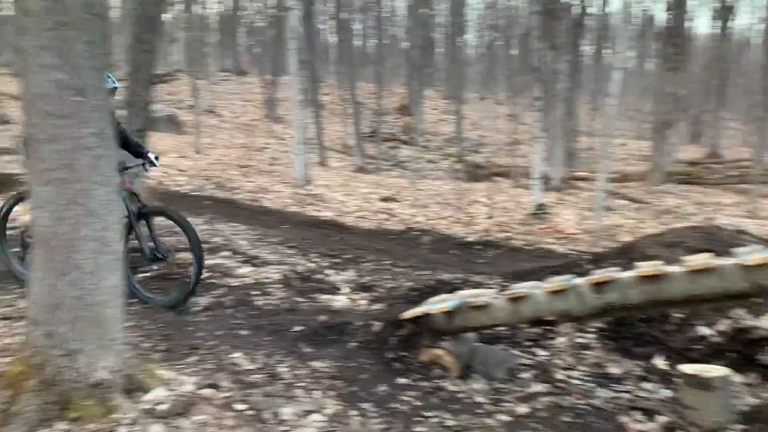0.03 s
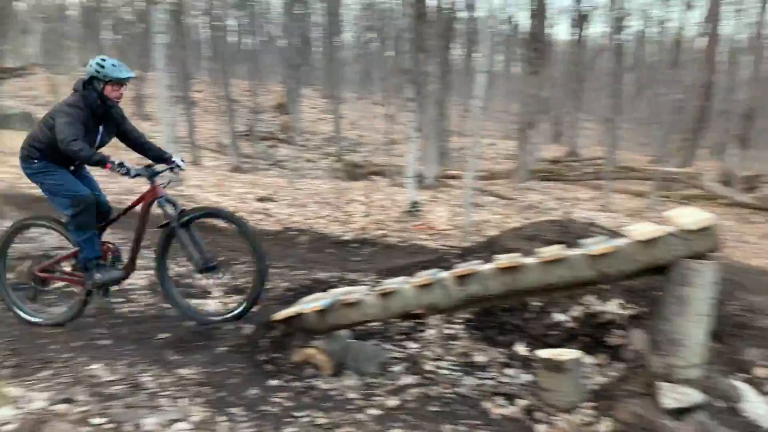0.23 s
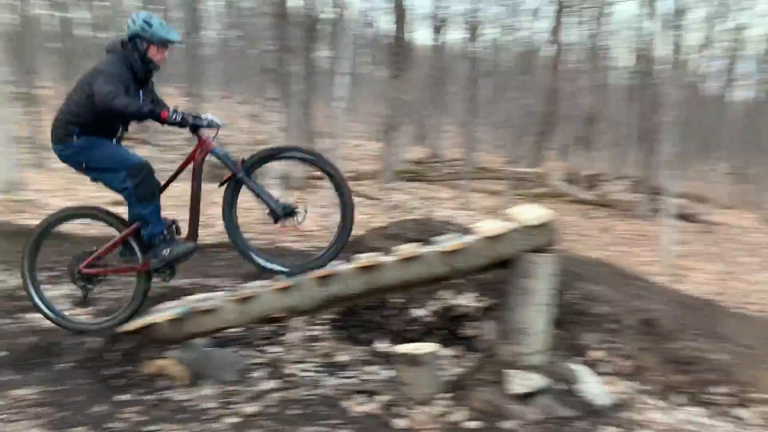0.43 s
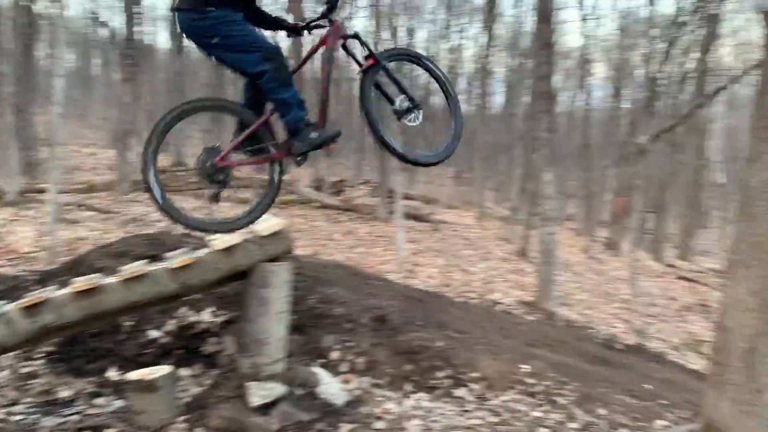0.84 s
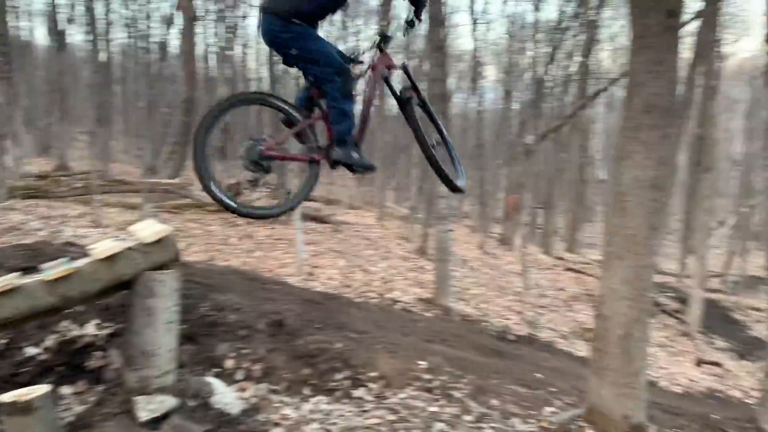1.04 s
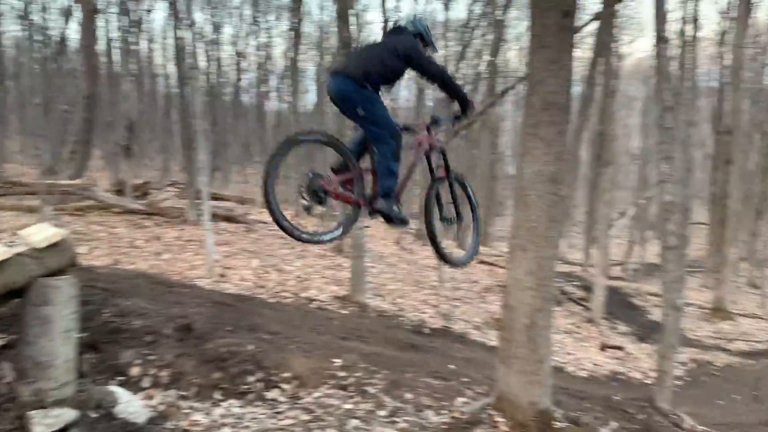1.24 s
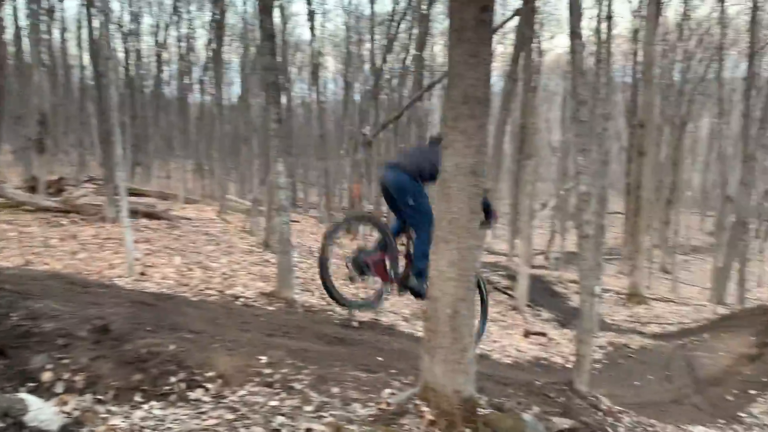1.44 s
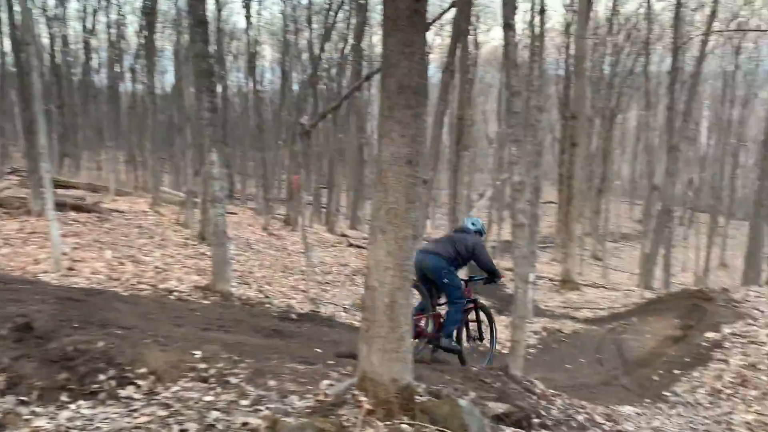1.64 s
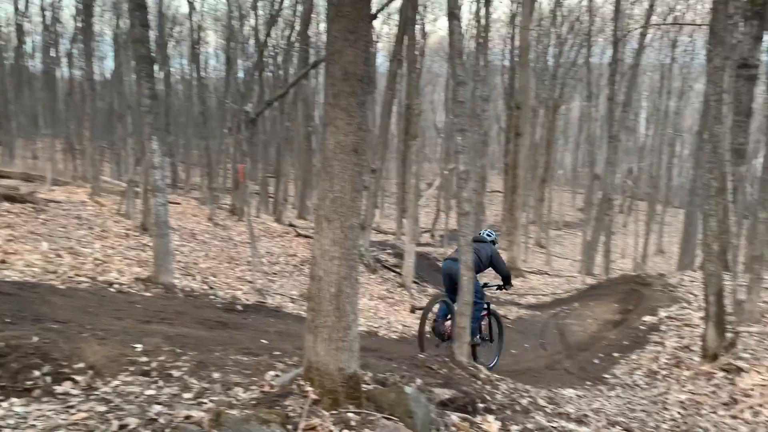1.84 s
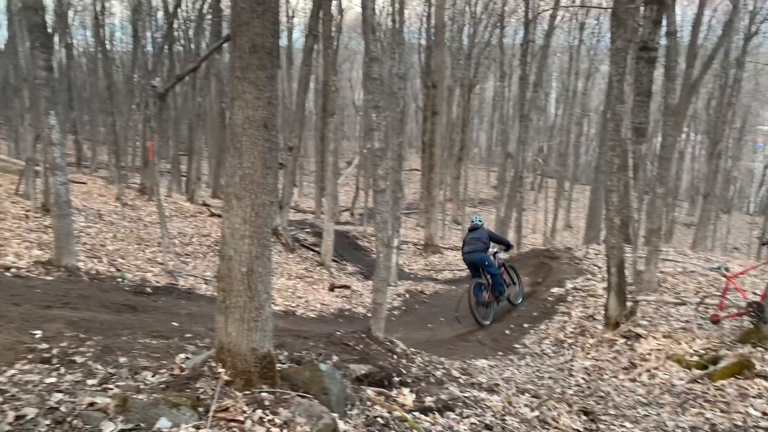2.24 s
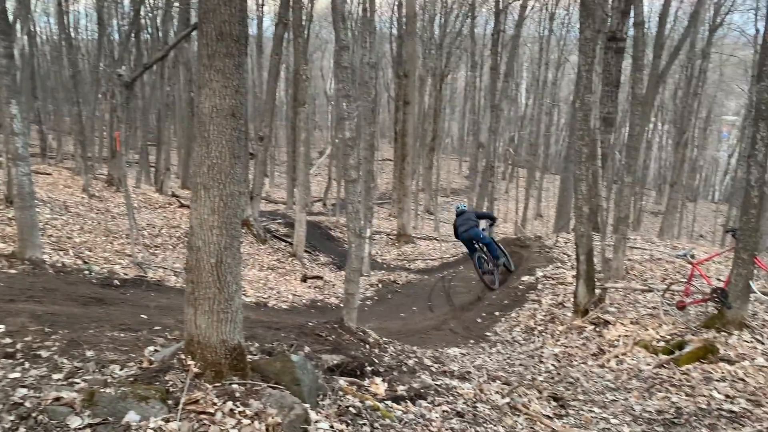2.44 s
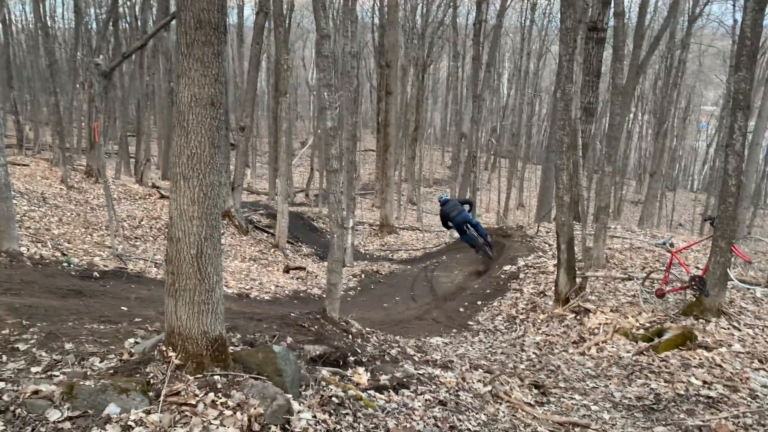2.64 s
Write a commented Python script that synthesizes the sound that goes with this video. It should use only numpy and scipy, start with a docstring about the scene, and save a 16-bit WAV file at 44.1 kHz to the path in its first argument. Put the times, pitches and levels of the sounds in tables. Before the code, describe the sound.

A mountain bike coasts along a quiet forest trail, hub ticking rapidly over rolling tyres. From about 0.3 to 0.9 seconds the tyres knock across a slatted wooden ramp. The ticking slows, then whirs on in the air. Both wheels thump down around 1.6 seconds and the chain clanks just after. The bike crunches away over dirt and leaves, with thin, very high brake chirps from 2.3 to 2.6 seconds.

```python
"""A freehub ticks over rolling tyres as a mountain bike coasts past on a forest trail; each tick is
the pawls dropping over a tooth. The tyres knock over a slatted wooden ramp, and the ticking slows at
take-off and whirs on in the air. Both wheels thump down and the chain clanks against the frame.
The bike crunches away over dirt and leaves, its brake pad catching the disc in thin squeals."""
import sys
import numpy as np
from scipy import signal
from scipy.fft import rfft, irfft, next_fast_len
from scipy.io import wavfile
from scipy.ndimage import uniform_filter1d, map_coordinates

SR = 44100
rng = np.random.default_rng(int(sys.argv[2]) if len(sys.argv) > 2 else 0)


def persist_wave(psi):
    """Save psi, clipped to +-1, as 16-bit WAV."""
    counts = np.round(np.clip(psi, -1, 1) * 32767).astype(np.int16)
    wavfile.write(sys.argv[1], SR, np.atleast_2d(counts).T)


N = 119070
TIME_S = np.arange(N) / SR
AGE_S = np.arange(SR // 3) / SR

# Freehub speed before and after take-off. Each row: time in seconds, ticks per second.
RUN_IN_HZ = [(.002, 100.8), (.12, 92.6), (.22, 109), (.33, 104.7), (.45, 93.3), (.52, 83.4), (.58, 88),
             (.62, 78.7), (.7, 94.7), (.75, 80.2), (.81, 68.1)]
RUN_OUT_HZ = [(1.188, 54.2), (1.25, 59.8), (1.33, 58.4), (1.45, 60), (1.55, 82), (1.65, 75), (1.8, 90),
              (1.98, 93), (2.3, 97), (2.42, 90), (2.55, 78), (2.62, 72), (2.7, 45)]
# Single ticks as the cranks nearly catch up with the wheel. Each row: start in seconds, gain in dB.
SLOW_TICKS = [(0.817, 2), (0.833, -1), (0.855, 2), (0.872, 1.5), (.902, -0.5), (.959, 0.5), (1.011, 0),
              (1.043, 1), (1.073, -0.5), (1.102, 0), (1.127, 0.5), (1.150, 0.5), (1.169, 1.5)]
# Level curves. Each row: time in seconds, level in dB.
TICK_DB = [(0, -46), (.05, -49.5), (.14, -56), (.23, -43.5), (.34, -39.5), (.48, -38), (.59, -32.5),
           (.68, -34), (.8, -32), (1.05, -33), (1.25, -34), (1.45, -38), (1.58, -35.5), (1.66, -51),
           (1.76, -38.5), (1.98, -48.5), (2.15, -44), (2.35, -48), (2.6, -48), (2.7, -58)]
WHIR_DB = [(0, -63), (.35, -59), (.7, -52.5), (.88, -63), (1.0, -70), (1.15, -67), (1.3, -58.5),
           (1.5, -55.5), (1.68, -62), (1.85, -57), (2.05, -62.5), (2.27, -55.5), (2.5, -64), (2.7, -63)]
RUMBLE_DB = [(0, -54), (.12, -58), (.29, -51.5), (.45, -50), (.7, -49.5), (.88, -40.5), (.97, -51),
             (1.05, -62.5), (1.52, -57), (1.615, -38), (1.67, -54), (1.75, -50.5), (2.2, -54.5),
             (2.45, -63), (2.7, -56.5)]
DRONE_DB = [(0, -47), (.09, -60.5), (.22, -46.5), (.45, -48), (.64, -50), (.77, -55.5), (.9, -50.5),
            (1.07, -62), (1.52, -62), (1.64, -51), (1.75, -51.5), (1.95, -55.5), (2.28, -51), (2.45, -58),
            (2.7, -58)]
HISS_DB = [(0, -59.5), (.14, -60.5), (.3, -50), (.6, -51.5), (.81, -50), (.93, -63), (1.2, -52),
           (1.45, -53), (1.62, -52), (1.9, -54), (2.7, -65)]
CRUNCH_DB = [(0, -56.5), (.17, -57.5), (.28, -53.5), (.6, -47.5), (.76, -50), (.88, -51), (1.03, -58.5),
             (1.52, -58.5), (1.63, -50), (1.8, -51.5), (1.95, -53.5), (2.13, -50.5), (2.28, -52),
             (2.45, -55), (2.7, -57)]
# Noise spectra. Each row: frequency in Hz, relative level in dB.
HUB_COLOUR = [(300, -61), (1500, -20), (2400, -6.5), (3200, -28), (4100, -7), (5600, -16), (6300, 2),
              (7800, -7), (9200, -6), (10000, 4.5), (11800, 5.5), (13000, -3), (14200, -1.5), (15200, 13),
              (15900, -14)]
WHIR_COLOUR = [(1500, -51), (2100, -12.5), (2400, 4), (2700, -2), (3100, -20), (5000, -48)]
RUMBLE_COLOUR = [(20, -48), (40, -17.5), (60, -5), (75, -3.5), (110, -15.5), (170, -21), (400, -90)]
DRONE_COLOUR = [(60, -15), (125, -3), (170, 1), (235, 4), (280, 2.5), (345, 0.5), (480, -11.5),
                (900, -17.5), (2000, -79)]
HISS_COLOUR = [(1500, -1), (3100, 3.5), (3900, 9), (5200, 9), (6600, 6), (8000, 4), (12000, 2)]
CRUNCH_COLOUR = [(200, -26), (500, -3), (800, 1), (1150, 0.5), (1450, -7), (2000, -1), (2550, -9.5),
                 (3200, -5.5), (6500, -22), (11000, -3.5), (16000, -20)]
FOREST_COLOUR = [(20, 11), (80, -30), (300, -30), (700, -0.5), (2400, 12.5), (3500, -27.5), (16000, -13.5)]
DIRT_COLOUR = [(60, 12), (300, -11.5), (430, -1.5), (560, 0), (760, 4), (1050, 0), (1400, -17), (2600, -17),
               (4000, -14), (15000, -62)]
BOOM_COLOUR = [(50, -35), (110, -9.5), (170, 6.5), (230, -1), (300, -7.5), (420, -29), (900, -13),
               (2000, -67)]
GRIT_COLOUR = [(500, -30), (1000, -12), (1350, -5), (1700, 2.5), (2200, -13), (2600, -2), (3100, -11.5),
               (6000, -23), (15000, -33)]
WOOD_COLOUR = [(60, -20), (110, 1), (170, 1), (270, 9.5), (500, -5.5), (800, -3.5), (1250, -4),
               (1500, -16.5), (1850, -5), (2800, -33), (5000, -22), (15000, -68)]
DECK_COLOUR = [(100, -21), (220, -4), (330, 0.5), (420, -6), (520, -12), (780, -10), (1200, -20),
               (2500, -47)]
CRACK_COLOUR = [(500, 0), (2600, 1.5), (4000, -1.5), (6000, 1), (10000, 13.5), (12500, 10.5), (16000, 0)]
ECHO_COLOUR = [(60, 0), (400, -1), (2500, -8.5), (14000, -15.0)]
# Tyres hitting dirt. Each row: start in seconds, then slap, boom and grit levels in dB.
SLAPS = [(0.129, -40, -56, -62), (0.154, -41.5, -33.5, -61), (.188, -40, -47, -50),
         (1.544, -34, -24.5, -39), (1.596, -30.5, -25.5, -37), (1.608, -38, -25.5, -37),
         (1.63, -34, -35, -31), (1.65, -43, -27, -64), (1.677, -38, -46, -66), (2.281, -52, -32, -47.5),
         (2.523, -39, -37, -46), (2.674, -42, -34.5, -49)]
# Wheels meeting the ramp, the ground and a bump.
# Each row: start in seconds, level in dB, pitch in Hz, rise and T60 in seconds.
THUMPS = [(0.206, -32.5, 78.6, .01, .12), (0.346, -27, 68, 0.0075, 0.12), (0.521, -29, 65.5, .008, 0.21),
          (1.55, -16.5, 83, 0.0064, 0.12), (1.602, -4, 96, 0.016, 0.052),
          (1.848, -27.5, 110.5, 0.0063, 0.074)]
# Tyres hitting slats. Each row: start in seconds, knock in dB, ring pitch in Hz, ring and grit in dB.
SLATS = [(0.328, -28, 1288, -30.5, -38), (.385, -36.5, 826, -44, -43), (0.411, -36.5, 1098, -27.5, -32.5),
         (0.444, -35, 1052, -36, -57), (0.454, -58, 331, -28, -60), (0.499, -27, 276, -37, -32),
         (.511, -47, 916, -40, -47), (.550, -35, 818, -24.5, -61), (.571, -40, 760, -35, -36),
         (.597, -30.5, 1022, -33.5, -52), (.607, -37, 231, -23, -45), (0.625, -39, 337, -30.5, -54),
         (0.649, -35.5, 1102, -30, -51), (0.661, -53, 169, -29, -67), (0.681, -50, 280, -44, -50),
         (0.81, -36, 1150, -37, -42.5), (0.838, -38, 260, -45, -41.5), (.892, -38, 329, -37, -46)]
# Chain hitting the frame. Each row: start in seconds, crack and ring levels in dB.
CLANKS = [(0.498, -61, -43), (1.472, -26.5, -63), (1.693, -30.5, -69), (1.721, -23, -28), (1.738, -18, -25)]
# Modes of chain and frame. Each row: frequency in Hz, gain in dB, T60 in seconds.
METAL_MODES = [(1073, -17, 0.22), (2430, -29, 0.034), (2540, 5.5, 0.049), (2670, -6, 0.14),
               (3120, -15.5, 0.033), (3480, -13, 0.11), (5140, -13.5, 0.06), (5910, -14.5, 0.17),
               (7120, -6.5, 0.057), (9150, 3.5, 0.034)]
# Brake chirps. Each row: start in seconds, length in seconds, level in dB.
SQUEALS = [(2.318, 0.021, -26.5), (2.333, 0.033, -27), (2.35, 0.042, -31), (2.389, 0.022, -28),
           (2.412, 0.028, -28), (2.437, 0.028, -30), (2.464, 0.015, -31), (2.556, 0.013, -28.5)]
# Stereo likeness. Each row: frequency in Hz, left-right correlation.
COHERENCE = [(300, 0.99), (500, 0.82), (1000, 0.68), (2500, 0.72), (6000, 0.43), (15000, 0.43)]
HUB_COHERENCE = [(2500, 0.66), (6500, 1), (11000, 0.23), (15000, 0.72)]
HISS_COHERENCE = [(1500, 0.27), (4000, 0.18), (7000, 0.31), (15000, .2)]
# Stereo phase of the hub. Each row: frequency in Hz, left lead in radians.
HUB_LEAD_RAD = [(1000, 0.43), (2600, 5.24), (4500, 5.23), (6500, 4.68), (11000, 4), (15000, 16.9)]
# Bearing of the bike. Each row: time in seconds, left lead in milliseconds.
LEAD_MS = [(0, 0.21), (.9, 0.12), (1.3, 0.098), (1.7, 0.026), (2.7, -0.043)]
# Balance of the bike. Each row: time in seconds, left minus right in dB.
PAN_DB = [(0, 0), (1.1, -0.5), (1.5, -0.5), (2.7, -2)]
# Microphone dips. Each row: centre in Hz, width in Hz, gain in dB.
NOTCHES = [(8650, 380, -16), (13560, 270, -20)]


def amp(db):
    """Decibels to gain."""
    return 10 ** (np.asarray(db) / 20)


def along(rows, hz):
    """Interpolate (Hz, value) rows on a log axis."""
    knots_hz, values = np.transpose(rows)
    return np.interp(np.log(hz + 1), np.log(knots_hz + 1), values)


def curve(rows, time_s=TIME_S):
    """Interpolate (s, value) rows linearly."""
    return np.interp(time_s, *np.transpose(rows))


def wobble(rate_hz):
    """Smooth random curve, rate_hz knots a second."""
    return map_coordinates(rng.standard_normal(N // 8), [TIME_S * rate_hz], mode="wrap")


def filtered(x, response):
    """Apply a frequency response."""
    size = next_fast_len(N + SR // 4)
    hz = np.fft.rfftfreq(size, 1 / SR)
    return irfft(rfft(x, size) * response(hz), size)[..., :N]


def noise(colour, coherence=COHERENCE, grain=1):
    """Coloured stereo noise of rms 1; grain is a gain applied before the colour."""
    def mid_side_gains(hz):
        angle_rad = np.arccos(np.clip(along(coherence, hz), -1, 1)) / 2
        return amp(along(colour, hz)) * [np.cos(angle_rad), np.sin(angle_rad)]

    mid, side = filtered(grain * rng.standard_normal((2, N)), mid_side_gains)
    stereo = np.array([mid + side, mid - side])
    return stereo / np.sqrt(np.mean(stereo ** 2) + 1e-20)


def recoloured(burst, colour):
    """Give both channels one broad colour, keeping fine resonances; return the first half."""
    spectrum = rfft(burst)
    broad_power = np.abs(uniform_filter1d(np.abs(spectrum) ** 2, size=200, axis=1))
    whitened = spectrum / np.sqrt(broad_power + 1e-20)
    hz = np.linspace(0, SR / 2, whitened.shape[1])
    return irfft(whitened * amp(along(colour, hz)))[:, :burst.shape[1] // 2]


def fade(rise_s, t60_s):
    """Attack and exponential decay of a blow."""
    return (1 - np.exp(-AGE_S / rise_s)) * np.exp(-np.log(1000) * AGE_S / t60_s)


def add(out, start_s, x):
    """Mix x into out at start_s."""
    i = max(round(start_s * SR), 0)
    out[..., i:i + x.shape[-1]] += x[..., :max(N - i, 0)]


def blows(rows, shape):
    """One copy of shape per (s, dB, ..) row."""
    out = np.zeros(N)
    for start_s, db, *_ in rows:
        add(out, start_s, amp(db) * shape)
    return out


def tick_times(rates):
    """Times in seconds at which the pawls drop over a tooth."""
    time_s = TIME_S[(TIME_S >= rates[0][0]) & (TIME_S <= rates[-1][0])]
    teeth = np.cumsum(curve(rates, time_s)) / SR
    return np.interp(np.arange(teeth[-1]), teeth, time_s)


def freehub(scatter_db=2.18, chatter_db=-0.5, ring_db=-1, tail_db=-11):
    """At each tooth the pawls drop in a dry chatter that rings the hub; the wheel whirs faintly."""
    fast_s = np.r_[tick_times(RUN_IN_HZ), tick_times(RUN_OUT_HZ)]
    ticks = list(zip(fast_s, scatter_db * rng.standard_normal(len(fast_s)))) + SLOW_TICKS
    ticks = [(start_s, db + curve(TICK_DB, start_s)) for start_s, db in ticks]
    shape = fade(rise_s=0.0012, t60_s=0.0085) + amp(tail_db) * fade(rise_s=0.0012, t60_s=0.05)
    shape /= shape.max()
    # The chatter is new at every tick; the ring repeats.
    chatter = amp(chatter_db) * noise(HUB_COLOUR, HUB_COHERENCE) * blows(ticks, shape)
    burst = noise(HUB_COLOUR, HUB_COHERENCE)[:, :len(AGE_S)] * shape
    ring = recoloured(burst, HUB_COLOUR)
    ring *= amp(ring_db) * np.linalg.norm(shape) / np.linalg.norm(ring[0])
    impulses = blows(ticks, np.ones(1))
    rings = signal.fftconvolve(impulses[None], ring, axes=1)[:, :N]
    whir = noise(WHIR_COLOUR, HUB_COHERENCE) * amp(curve(WHIR_DB))
    sides = np.array([[0.5], [-0.5]])
    return filtered(chatter + rings + whir, lambda hz: np.exp(1j * along(HUB_LEAD_RAD, hz) * sides))


def rolling(grain_db=3.7, lumps_db=1.5):
    """Tyres rumble, drone, hiss and crunch over the trail, and ease off in the air."""
    rumble = noise(RUMBLE_COLOUR) * amp(curve(RUMBLE_DB))
    drone = noise(DRONE_COLOUR) * amp(curve(DRONE_DB))
    grain = amp(grain_db * wobble(rate_hz=1200) + lumps_db * wobble(rate_hz=64))
    hiss = noise(HISS_COLOUR, HISS_COHERENCE) * amp(curve(HISS_DB))
    crunch = noise(CRUNCH_COLOUR, grain=grain) * amp(curve(CRUNCH_DB))
    return rumble + drone + hiss + crunch


def forest(level_db=-70.5):
    """Faint, steady background hush."""
    return amp(level_db) * noise(FOREST_COLOUR)


def wheel_impacts():
    """Tyres slap the dirt and boom at bumps and touch-down; the wheels bounce with a low thump."""
    out = noise(DIRT_COLOUR) * blows(SLAPS, fade(rise_s=0.0025, t60_s=0.075))
    booms = [(start_s, boom_db) for start_s, _, boom_db, _ in SLAPS]
    out += noise(BOOM_COLOUR) * blows(booms, fade(rise_s=0.012, t60_s=0.084))
    for start_s, db, hz, rise_s, t60_s in THUMPS:
        add(out, start_s, amp(db) * fade(rise_s, t60_s) * np.sin(2 * np.pi * hz * AGE_S))
    return out


def crushed_grit(grain_db=4):
    """Each tyre blow, on wood or dirt, crushes a little grit."""
    strikes = [(start_s, grit_db) for start_s, *_, grit_db in SLATS + SLAPS]
    grit = noise(GRIT_COLOUR, grain=amp(grain_db * wobble(rate_hz=1500)))
    return grit * blows(strikes, fade(rise_s=0.0019, t60_s=0.065))


def ramp(deck_db=-10.5, overtone_ratio=1.5, overtone_db=-12.5):
    """Each slat knocks, rings briefly at its own pitch and shakes the whole deck."""
    out = noise(WOOD_COLOUR) * blows(SLATS, fade(rise_s=0.0012, t60_s=0.094))
    out += amp(deck_db) * noise(DECK_COLOUR) * blows(SLATS, fade(rise_s=0.011, t60_s=0.33))
    for start_s, _, hz, ring_db, _ in SLATS:
        phase = 2 * np.pi * hz * AGE_S
        ring = np.sin(phase) + amp(overtone_db) * np.sin(overtone_ratio * phase)
        add(out, start_s, amp(ring_db) * fade(rise_s=0.0012, t60_s=0.07) * ring)
    return out


def chain_clank(jitter_rad=1.0, jangle_db=-13):
    """The chain whips against the frame: a sharp crack, a jangle and a short, rough metal ring."""
    crack = fade(rise_s=0.00039, t60_s=0.014)
    jangle = amp(jangle_db) * fade(rise_s=0.011, t60_s=0.14)
    out = noise(CRACK_COLOUR) * blows(CLANKS, crack + jangle)
    for start_s, _, ring_db in CLANKS:
        for hz, mode_db, t60_s in METAL_MODES:
            phase = 2 * np.pi * (hz * AGE_S + rng.random())
            jitter = map_coordinates(rng.standard_normal(128), [AGE_S * 250], mode="wrap")
            ring = fade(rise_s=0.0035, t60_s=t60_s) * np.sin(phase + jitter_rad * jitter)
            add(out, start_s, amp(ring_db + mode_db) * ring)
    return out


def brake(pitch_hz=12960, sag_hz_per_s=170, waver_hz=89, left_lag_rad=2.63, flutter_db=2):
    """The pad catches the disc in short, very high chirps; the pitch sinks as the disc slows."""
    out = np.zeros((2, N))
    for start_s, length_s, db in SQUEALS:
        swell = np.sqrt(np.abs(np.hanning(int(length_s * SR))))
        centre_hz = pitch_hz - sag_hz_per_s * (start_s - SQUEALS[0][0])
        hz = centre_hz + waver_hz * wobble(rate_hz=350)[:len(swell)]
        phase = 2 * np.pi * np.cumsum(hz) / SR
        add(out, start_s, amp(db) * swell * np.sin([phase - left_lag_rad, phase]))
    return out * amp(flutter_db * wobble(rate_hz=32))


def passing(x):
    """Delay and balance carry the sound from left to right."""
    lead_s = curve(LEAD_MS) / 1000
    channels = []
    for channel, side in zip(x, (0.5, -0.5)):
        shifted = map_coordinates(channel, [(TIME_S + side * lead_s) * SR], order=5)
        channels.append(shifted * amp(side * curve(PAN_DB)))
    return np.array(channels)


def tree_echo(x, level_db=-17):
    """Trunks scatter a faint tail back."""
    tail = noise(ECHO_COLOUR)[:, :len(AGE_S)] * fade(rise_s=0.0064, t60_s=0.4)
    tail /= np.linalg.norm(tail[0])
    return amp(level_db) * signal.fftconvolve(x, tail, axes=1)[:, :N]


def scene():
    """The bike, its echo and the quiet forest."""
    bike = freehub() + brake()
    bike += passing(ramp() + wheel_impacts() + crushed_grit() + chain_clank() + rolling())
    return bike + tree_echo(bike) + forest()


def record(dry):
    """The microphone has two treble dips and a band limit."""
    def response(hz, top_hz=16100):
        dips_db = sum(db * np.exp(-((hz - mid_hz) / width_hz) ** 2) for mid_hz, width_hz, db in NOTCHES)
        return amp(dips_db) * (hz < top_hz)

    return filtered(dry, response)


dry = scene()
out = record(dry)
persist_wave(out)
```